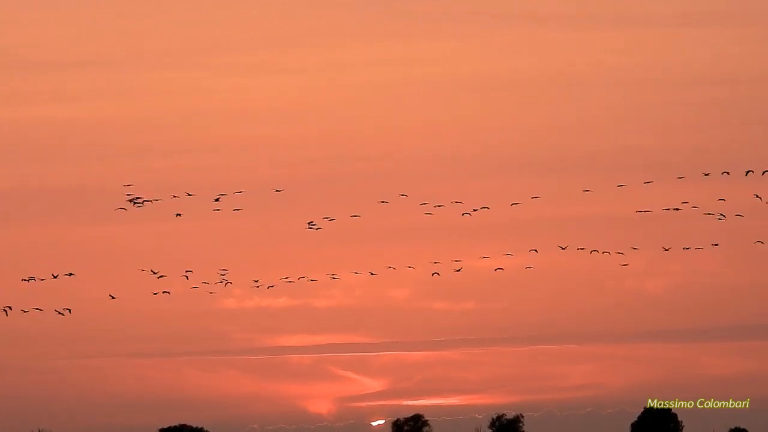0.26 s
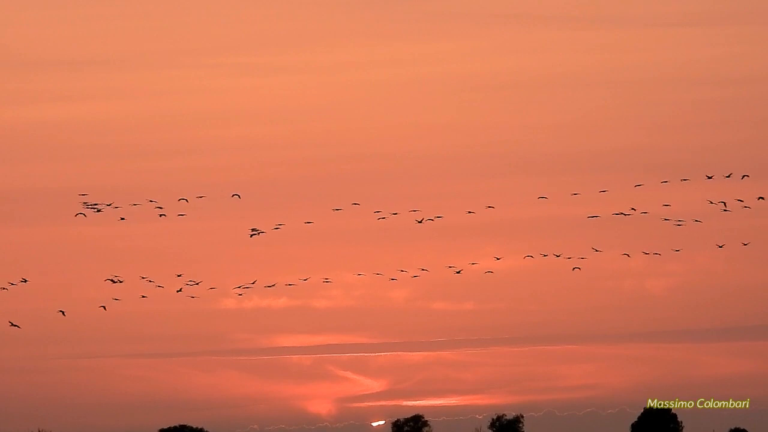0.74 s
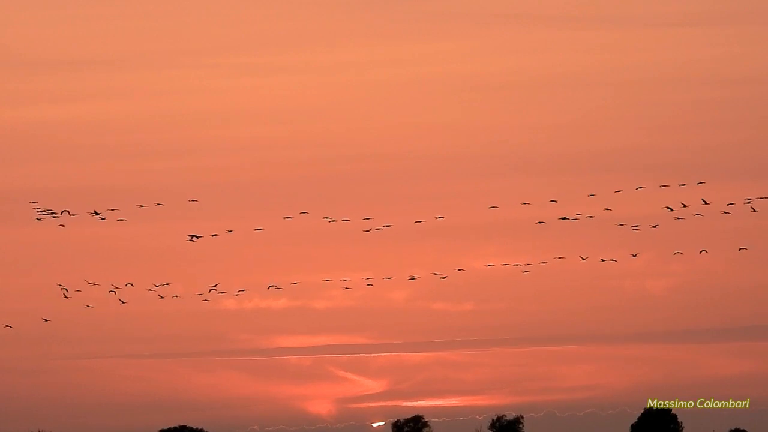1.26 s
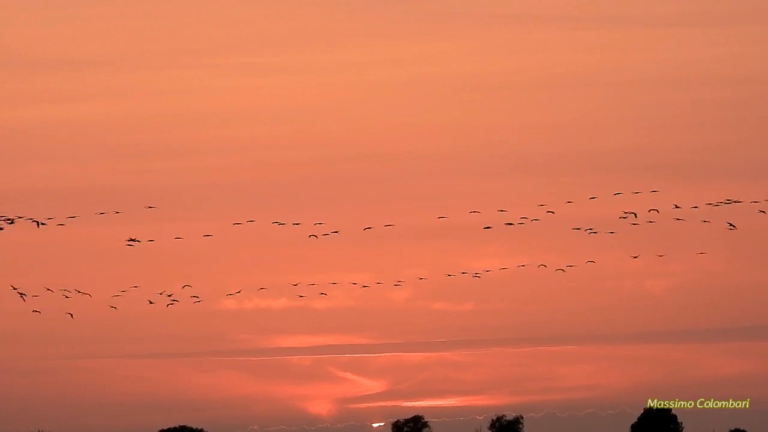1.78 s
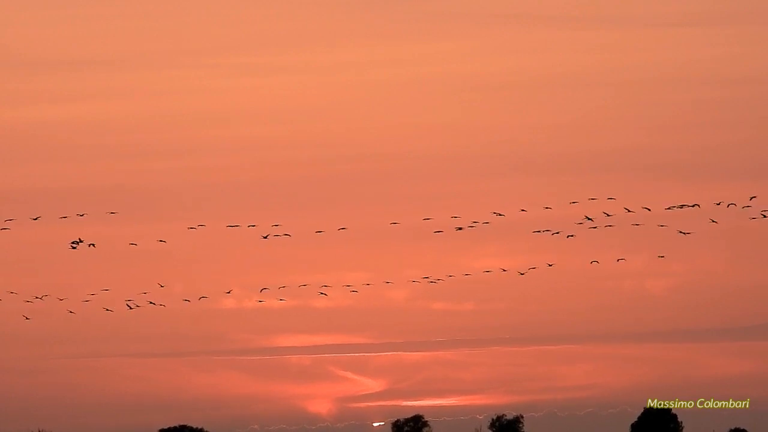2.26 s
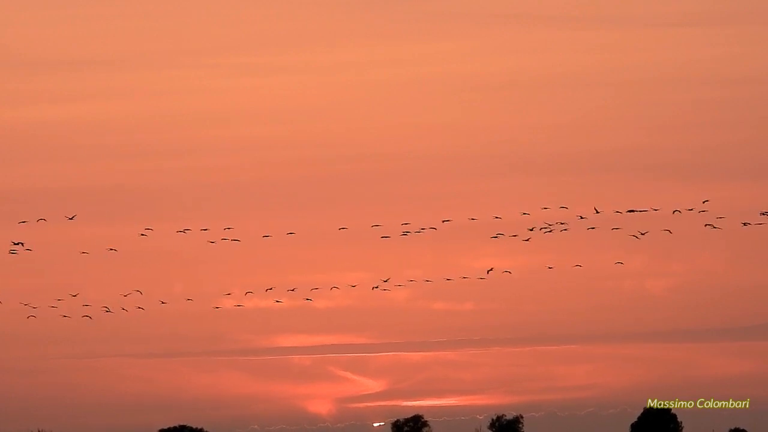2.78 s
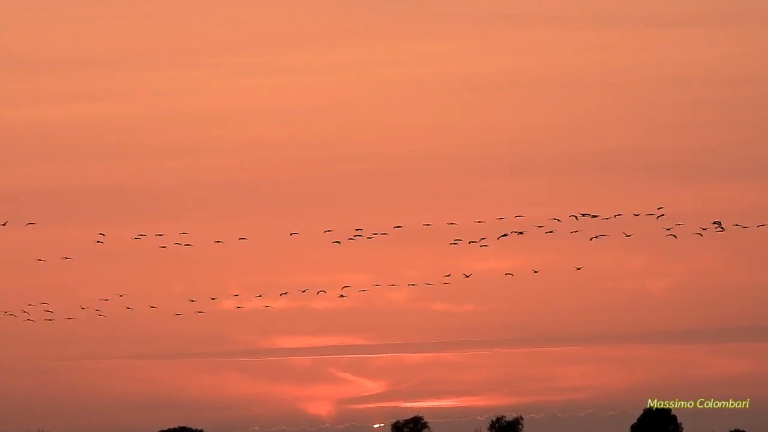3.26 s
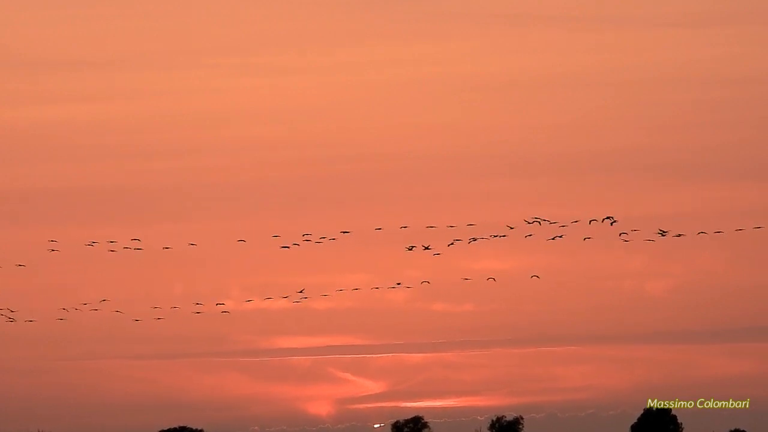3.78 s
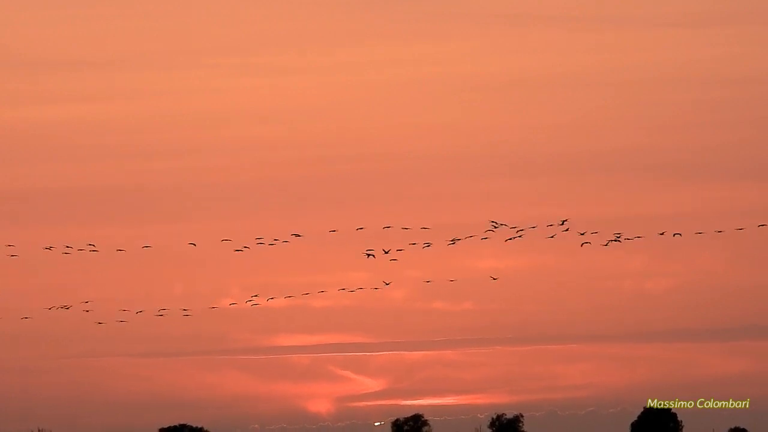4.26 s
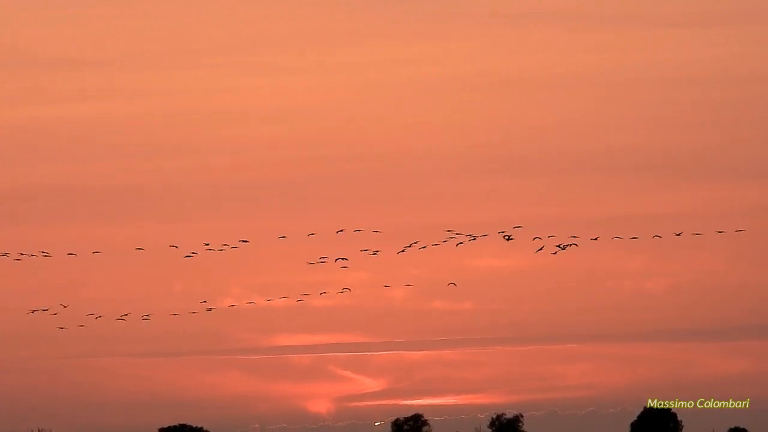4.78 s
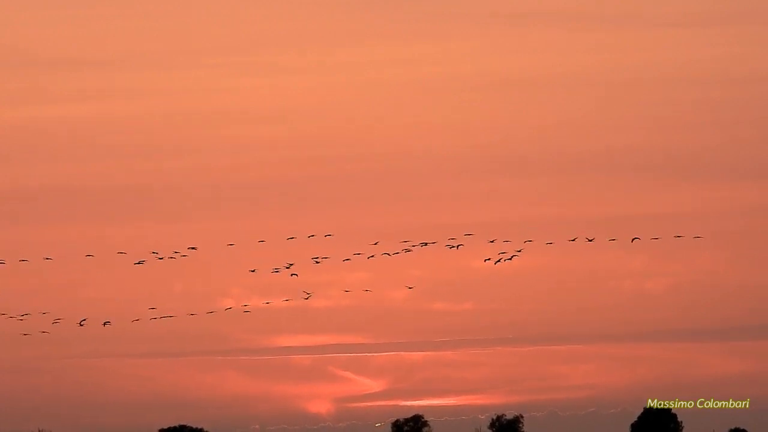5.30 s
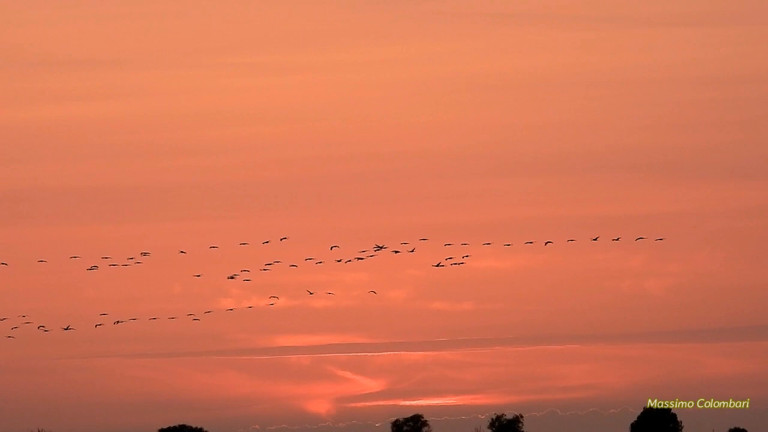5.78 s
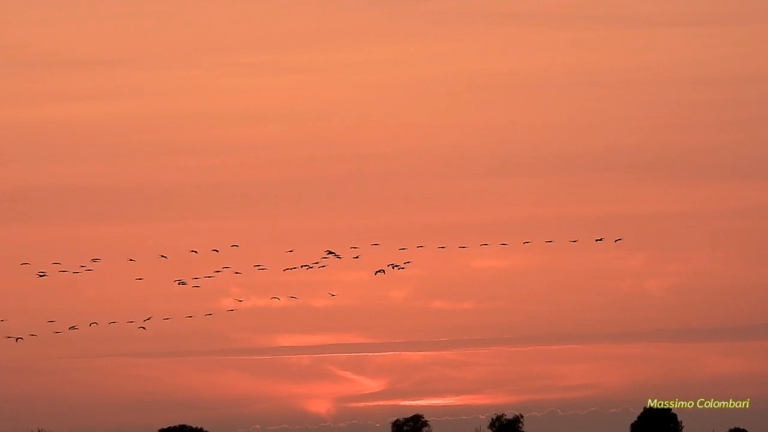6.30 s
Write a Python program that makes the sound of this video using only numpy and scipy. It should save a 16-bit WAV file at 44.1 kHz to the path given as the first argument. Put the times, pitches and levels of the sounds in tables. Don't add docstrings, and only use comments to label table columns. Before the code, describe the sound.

Outdoors, a long flock of cranes passes high up: rolling, throaty rattles, short yelps and trumpeted notes overlap over a breathy far chorus. A trilled young whistle comes early, more thin peeps past the middle, and a loud warbling bugle near the end. Faint rumble of open air and a few dull bumps on the microphone body. Little echo; everything is on the right, with only quiet electronic hiss on the left.

```python
import sys
import numpy as np
from scipy import signal
from scipy.fft import rfft, irfft
from scipy.io import wavfile
from scipy.ndimage import uniform_filter1d

SR = 44100
rng = np.random.default_rng(int(sys.argv[2]) if len(sys.argv) > 2 else 0)


def ratio(d):
    e = np.asarray(d, float) / 20
    return 10 ** e


def put_to_file(sound):
    columns = np.atleast_2d(sound).T
    safe = np.clip(columns, -1, 1)
    whole_steps = np.round(safe * 32767)
    wavfile.write(sys.argv[1], SR, whole_steps.astype(np.int16))


N = 288414


def read(table, hz):
    f, db = np.transpose(table)
    return ratio(np.interp(np.log(hz + 1), np.log(f), db))


def unit(x):
    return x / np.sqrt(np.mean(x ** 2))


def noise(colour):
    spectrum = rfft(rng.standard_normal(N))
    return unit(irfft(spectrum * read(colour, np.fft.rfftfreq(N, 1 / SR)), N))


def walk(n, rate):
    k = int(SR / rate)
    steps = np.repeat(rng.standard_normal(n // k + 1), k)
    return 1.3 * uniform_filter1d(uniform_filter1d(steps, k), k)[:n]


def add(out, start, x):
    out[start:start + len(x)] += x[:len(out) - start]


def curve(rows, edge_s):
    s, *columns = np.transpose(rows)
    t = np.arange(int(max(s[0] - edge_s, 0) * SR), int((s[-1] + edge_s) * SR)) / SR
    ends = np.clip(np.minimum(t - s[0], s[-1] - t) / edge_s + 1, 0, 1) ** 2
    return t, [uniform_filter1d(np.interp(t, s, c), size=400) for c in columns], ends


# f/Hz, level/dB
THROAT_COLOUR = [(1700, 2), (2200, 0.5), (2600, 0), (3300, 3.5), (4200, -6), (5500, -13.5), (7000, -26),
                 (11000, -56)]


def horn(hz, tilt_db=0., twinkle_db=0., count=7):
    phase = 2 * np.pi * (np.cumsum(hz) / SR + rng.random())
    over = 0
    for k in range(2, count + 1):
        db = tilt_db * (k - 3)
        if twinkle_db:
            db = db + twinkle_db * walk(len(hz), 260)
        over = over + read(THROAT_COLOUR, k * hz.mean()) * ratio(db) * np.sin(k * phase + k * k)
    return np.sqrt(2) * np.sin(phase), np.sqrt(2) * over


# f/Hz, level/dB per Hz
RASP_COLOUR = [(800, -41), (1500, -12.5), (3300, 7.5), (5000, 0.5), (6500, -11), (8500, -25), (12000, -66)]


def rasping_air():
    return noise(RASP_COLOUR)


# f/Hz, level/dB per Hz
HISS_COLOUR = [(20, -27), (50, -20), (120, -7), (300, -1), (1000, -3.5), (5000, -1.5), (15000, -3),
               (20000, -32)]


def amplifier_hiss():
    return ratio(-60.5) * np.array([noise(HISS_COLOUR), noise(HISS_COLOUR)])


# f/Hz, level/dB per Hz
RUMBLE_COLOUR = [(20, -62), (60, -7.5), (200, -3.5), (400, 4), (900, -6.5), (3000, -60)]


def country_rumble():
    return ratio(-65 + 1.4 * np.tanh(walk(N, 7.0))) * noise(RUMBLE_COLOUR)


# middle t/s, length t/s, strength level/dB,
# share of high voices (0-1), rasp of birds overhead level/dB
FLOCK_SURGES = [(0.0, 0.085, -30.5, 0.95, -24), (0.122, 0.22, -40, 0.05, -25), (0.365, 0.67, -45, 0.8, 1.5),
                (0.704, 0.21, -40.5, 0.5, 4), (1.135, 0.3, -42.5, 0.46, -23),
                (1.307, 0.35, -37, 0.48, -2.5), (1.735, 0.19, -35, 0.7, 0.5), (2.28, 0.35, -39, 0.46, 5.5),
                (2.453, 0.37, -39.5, 1, -15), (2.74, 0.29, -40.5, 0.07, -4.5), (2.886, 0.15, -38.5, 1, -34),
                (3.178, 0.28, -40, 0.68, -5), (3.459, 0.2, -35.5, 0.89, 5), (3.948, 0.33, -32, 0.94, -5.5),
                (4.176, 0.16, -43.5, 0.26, -28), (4.51, 0.23, -39.5, 0.87, 4.5),
                (5.072, 0.24, -36.5, 0.82, -34), (5.531, 0.23, -35.5, 1, -1),
                (5.74, 0.24, -40.5, 0.24, -27), (5.978, 0.21, -38.5, 0.68, -28), (6.223, 0.21, -46.5, 0, 2),
                (6.54, 0.17, -34, 1, -1)]


def surges():
    t = np.arange(N) / SR
    murmur_db, murmur_rasp_db = -49.5, -75
    power = np.ones((3, N)) * ratio([[murmur_db], [murmur_db], [murmur_rasp_db]]) ** 2
    for s, length_s, db, share, rasp_db in FLOCK_SURGES:
        share = np.clip(share, 0, 1)
        swell = ratio(2 * db) * np.exp(-(2 * (t - s) / length_s) ** 2)
        power = power + np.outer([1 - share, share, ratio(2 * rasp_db)], swell)
    return 10 * np.log10(power)


def chorus(hz, spread, count):
    low, over, pulsing = np.zeros((3, N))
    for place, (late, size, pitch, roll, loud) in enumerate(rng.random((count, 5))):
        n = int((.22 + .2 * size) * SR)
        u, t = np.arange(n) / n, np.arange(n) / SR
        cycle = (t * (19 + 7 * roll)) % 1
        open_share = 0.2473 + 0.412 * u
        gate = uniform_filter1d(1. * (cycle < open_share), size=130)
        gate = ratio(2 * loud) * gate * np.sin(np.pi * u) ** 0.079
        call_arch = .04 * np.sin(np.pi * u)
        pulse_arch = .03 * np.sin(np.pi * cycle / open_share)
        arch = 1 + call_arch + pulse_arch + .016 * walk(n, 170)
        bird_hz = hz * (1 + spread * (2 * pitch - 1))
        a, b = horn(bird_hz * arch, tilt_db=-1.0, count=6)
        start = int((place + late) / count * N)
        lead = min(start, n // 2)
        for layer, x in [(low, a * gate), (over, b * gate), (pulsing, gate)]:
            add(layer, start - lead, x[n // 2 - lead:])
    return low, over, pulsing


def steady(x, keep=0.058):
    power = uniform_filter1d(x ** 2, size=5000) + 1e-9
    return unit(x / power ** ((1 - keep) / 2))


# f/Hz, level/dB per Hz
WASH_COLOUR = [(200, -33), (500, 0), (1300, 8.5), (3500, -6), (6000, -55), (9000, -59)]


def breathy_wash(over_db):
    gasps_db = 3 * walk(N, 25)
    return ratio(-52 + 0.69 * (over_db + 56) + gasps_db) * noise(WASH_COLOUR)


# middle t/s, length t/s, level
# change/dB
FLOCK_LULLS = [(.3, .03, 1), (.85, 0.023, -1.5), (1.085, 0.015, 0), (1.1, .02, -5.5), (1.365, 0.013, -7.5),
               (1.552, 0.025, -4), (1.61, 0.014, 1), (1.879, 0.044, -2.5), (3.117, .02, -3.5),
               (3.156, .02, -1), (3.506, 0.011, -7), (3.68, 0.019, -5), (3.724, 0.02, -5),
               (4.31, 0.049, -4), (4.362, 0.042, -0.5), (5.4, 0.02, 1), (1.29, .015, -2), (3.168, .012, -1),
               (2.96, .12, -2.5), (.95, .15, -1), (2.005, .02, 1), (0.467, 0.047, -4.5), (5.6, .04, -6),
               (5.27, .06, -3.5), (3.8, .15, -1.5)]


def far_flock():
    low_db, high_db, rasp_db = surges()
    strength_db = 10 * np.log10(ratio(2 * low_db) + ratio(2 * high_db))
    over_db = -50.5 + 0.98 * (strength_db + 40)
    deep_low, deep_over, deep_pulsing = chorus(750, .13, count=70)
    high_low, high_over, high_pulsing = chorus(1010, .07, count=65)
    rasp = ratio(rasp_db - 13.0) * steady((deep_pulsing + high_pulsing) ** 1.06 * rasping_air())
    voices = ratio(low_db + 0.5) * steady(deep_low) + ratio(high_db - 3.5) * steady(high_low)
    voices = voices + ratio(over_db) * steady(deep_over + high_over)
    t = np.arange(N) / SR
    lull_db = sum(db * np.exp(-(2 * (t - s) / length_s) ** 2) for s, length_s, db in FLOCK_LULLS)
    return ratio(lull_db) * (voices + rasp + breathy_wash(over_db))


# t/s, peak level/dB, ring f/Hz
HAND_KNOCKS = [
    (1.058, -55, 109),
    (1.539, -53, 218),
    (1.614, -51, 240),
    (1.806, -56.5, 121),
    (1.923, -53, 266),
    (1.995, -52, 162),
    (2.628, -47.5, 239),
    (2.857, -34, 233),
    (2.92, -44.5, 236),
]


def knocks():
    out, t = np.zeros(N), np.arange(int(.15 * SR)) / SR
    for s, db, hz in HAND_KNOCKS:
        ring = np.sin(2 * np.pi * hz * t) + 0.29 * np.sin(2 * np.pi * 0.46 * hz * t)
        add(out, int(s * SR), ratio(db) * ring * (t / 0.016) * np.exp(1 - t / 0.0098))
    return out


# t/s, f/Hz, level/dB
YOUNG_WHISTLES = [
    [(0.62, 3700, -56), (0.68, 4420, -47.5), (0.755, 4700, -45), (0.778, 4300, -46), (0.792, 4200, -43),
     (0.83, 3400, -53)],
    [(4.575, 3900, -55), (4.61, 4920, -48), (4.65, 4420, -46), (4.71, 3320, -52)],
    [(4.75, 3550, -57), (4.8, 3940, -57), (4.85, 3940, -57), (4.93, 3350, -56)],
    [(6.04, 4350, -58), (6.1, 4550, -56), (6.145, 4800, -56), (6.22, 3750, -53)],
    [(0.484, 3900, -52), (0.492, 3750, -46), (0.503, 3600, -52)],
    [(4.545, 3850, -54), (4.562, 4400, -51), (4.575, 4850, -53)],
]
# rate f/Hz, depth as share of pitch, one crest t/s
WHISTLE_TRILLS = [
    (22.5, .075, .719),
    (20, .01, 4.61),
    (20, .01, 4.83),
    (23, .025, 6.14),
    (20, 0, .5),
    (20, 0, 4.56),
]


def whistles():
    out = np.zeros(N)
    for rows, (trill_hz, depth, crest_s) in zip(YOUNG_WHISTLES, WHISTLE_TRILLS):
        t, (hz, db), ends = curve(rows, 0.011)
        trill_fade = np.clip((t[-1] - t - .062) / .015, 0, 1)
        swing = np.cos(2 * np.pi * trill_hz * (t - crest_s)) * trill_fade
        pitch = hz * (1 + depth * swing + 0.0035 * walk(len(t), 62.4))
        trough_db = -3 * swing * (depth > .05)
        gain = ends * ratio(db + trough_db + 3.0 * walk(len(t), 200))
        add(out, int(t[0] * SR), gain * np.sin(2 * np.pi * np.cumsum(pitch) / SR))
    return out


def pulses(table, rasp_db):
    gap_s = .044
    for first, last, hz, db, over_db in table:
        for u in np.linspace(0, 1, round((last - first) / gap_s) + 1):
            rise = (2 * u - 1) * (last - first > gap_s / 2)
            yield first + u * (last - first), db + 0.5 * rise, hz * (1 + 0.029 * rise), over_db, rasp_db


# first pulse t/s, last pulse t/s, f/Hz, peak level/dB, overtones level/dB
PURRING_RATTLES = [(.121, .21, 854, -26.5, -3), (.514, .606, 1074, -30.5, 1), (.824, .958, 1020, -31, -29),
                   (1.087, 1.12, 836, -26.5, -10.5), (1.296, 1.296, 1067, -26.5, -30),
                   (1.566, 1.617, 1063, -31, 2.5), (1.9, 1.9, 1060, -35, -9), (2.017, 2.017, 1100, -37, -3),
                   (2.522, 2.596, 1008, -29, -3.5), (2.752, 2.752, 830, -34, -27),
                   (3.129, 3.177, 892, -28, -5.5), (3.693, 3.734, 914, -29, -12),
                   (3.754, 3.754, 1035, -38.5, 7.5), (4.32, 4.462, 1005, -28, -6),
                   (6.409, 6.461, 963, -31.5, -2), (1.132, 1.132, 848, -34, -3),
                   (1.345, 1.345, 1064, -24, -16), (1.377, 1.377, 1160, -30.5, -5),
                   (.863, .863, 1060, -30, -20), (3.45, 3.487, 1140, -34, 2), (3.524, 3.524, 1130, -50, 0),
                   (3.537, 3.537, 1120, -48, 7), (4.478, 4.5, 933, -30, -6), (.344, .344, 992, -41, 5),
                   (.36, .385, 1015, -40, 2.5), (1.172, 1.172, 1003, -44, 4), (.08, .08, 896, -27, -4),
                   (3.435, 3.435, 1123, -36.5, 6), (3.51, 3.51, 1162, -35.5, 4.5),
                   (3.473, 3.473, 1073, -39, 6)]
# first pulse t/s, last pulse t/s, f/Hz, peak level/dB, overtones level/dB
HARSH_RATTLES = [(.02, .28, 802, -41.5, 5), (.359, .387, 1005, -31.5, -23), (.653, .653, 1140, -35, -6),
                 (.791, .791, 1005, -35, -24), (1.162, 1.162, 953, -38.5, 9),
                 (1.335, 1.377, 1050, -28, -25), (1.66, 1.711, 1075, -32, 7), (1.779, 1.779, 960, -34, -21),
                 (2.139, 2.139, 1160, -43, -7), (2.154, 2.276, 809, -35, 1.5),
                 (2.351, 2.387, 1006, -26.5, -6), (2.644, 2.644, 1057, -33, -1),
                 (3.258, 3.301, 970, -36, -16), (3.433, 3.51, 1125, -30.5, -9),
                 (3.539, 3.574, 808, -33.5, -3), (4.491, 4.491, 980, -31, -14), (5.09, 5.139, 1013, -36, 3),
                 (5.075, 5.21, 742, -35.5, 0), (5.419, 5.419, 940, -34, -1), (6.507, 6.507, 1020, -33, 4.5),
                 (.318, .318, 1056, -34, -13), (.401, .425, 1040, -34.5, -23), (.492, .492, 1000, -36, -12),
                 (1.225, 1.225, 1020, -33, -4), (2.431, 2.431, 1067, -30.5, -1),
                 (2.507, 2.507, 1087, -42, 0), (2.76, 2.805, 987, -38, 2), (3.058, 3.094, 1000, -42, -10),
                 (3.527, 3.545, 1110, -40, -2), (4.97, 4.97, 800, -45, 5), (5.955, 5.955, 1100, -35, -9),
                 (3.992, 3.992, 1320, -27, -9), (3.57, 3.585, 1090, -57, -2), (6.521, 6.521, 1010, -34, 6),
                 (1.05, 1.05, 850, -49, 8)]


def rattles():
    out, t, air = np.zeros(N), np.arange(int(.04 * SR)) / SR, rasping_air()
    burst = np.clip(t / 0.0024, 0, 1) * np.exp(-(t / 0.012) ** 3)
    puff = np.clip(t / .004, 0, 1) * np.exp(-(t / .021) ** 2)
    for s, db, hz, over_db, rasp_db in [*pulses(PURRING_RATTLES, -32), *pulses(HARSH_RATTLES, -7)]:
        pitch = hz * (1.03 - .8 * t + 0.022 * walk(len(t), 150))
        low, over = horn(pitch, tilt_db=-1.5)
        start = int(s * SR)
        rasp = air[start:][:len(t)]
        add(out, start, ratio(db - 4.5) * burst * (low + ratio(over_db - 10.5) * over))
        add(out, start, ratio(db + rasp_db - 8.0) * puff[:len(rasp)] * rasp)
    return out


def note(start, end, hz, db, over_db, forced):
    if forced:
        scoop, drift, fall, release_s = .004, .02, .14, .06
        attack_s, attack_db, droop_db, release_db = 0, 2, 0.5, -5.5
    else:
        scoop, drift, fall, release_s = .025, .004, .04, .05
        attack_s, attack_db, droop_db, release_db = 0.04, -0.64, 1.5, 0.92
    part = (end - start) * .45
    fall = fall * min(part / release_s, 1)
    return [(start, hz * (1 - scoop), db + attack_db, over_db),
            (start + min(attack_s, part), hz, db, over_db),
            (end - min(release_s, part), hz * (1 - drift), db + droop_db, over_db),
            (end, hz * (1 - fall), db + release_db, over_db)]


def sing(out, rows, tilt_db, air, dips=()):
    t, (hz, db, over_db), ends = curve(rows, .006)
    dip = sum(d * np.exp(-((t - s) / 0.011) ** 2) for s, d in dips)
    strain = np.clip((hz.mean() - 800) / 80, .25, 1)
    pitch = hz * (1 - dip + .008 * strain * walk(len(t), 200))
    low, over = horn(pitch, tilt_db, twinkle_db=1.6 + 1.6 * strain, count=8)
    beat_hz = 70 * (1 + .25 * walk(len(t), 40))
    beat_db = 2.5 * strain * np.sin(2 * np.pi * np.cumsum(beat_hz) / SR + 6 * rng.random())
    low = low * ratio(1.5 * walk(len(t), 150) + beat_db)
    start = int(t[0] * SR)
    hoarse = ratio(-22) * strain * air[start:][:len(t)]
    over = over * ratio(beat_db) + hoarse
    add(out, start, (low + over * ratio(over_db)) * ends * ratio(db - 87 * dip))


# start t/s, end t/s, f/Hz, level/dB, overtones level/dB
HIGH_TURNED_AWAY = [
    (0.0, 0.083, 1077, -38, -17),
    (0.657, 0.765, 1086, -42, -9),
    (2.65, 2.794, 1046, -40.5, -26),
    (4.04, 4.149, 1090, -38.5, -18),
    (.448, .49, 1090, -46.5, -11),
    (5.6, 5.7, 1035, -40.5, -10.5),
    (5.435, 5.53, 1095, -37.5, -13),
    (5.375, 5.425, 630, -60, -20),
]
LOW_TURNED_AWAY = [
    (3.635, 3.672, 802, -53.5, 0),
    (0.56, 0.69, 800, -52, -5),
    (2.5, 2.722, 820, -53, -13),
    (4.661, 4.792, 840, -50, -14),
    (5.295, 5.45, 803, -50, -9.5),
    (5.851, 6.029, 960, -51, -10),
    (3.023, 3.08, 780, -55, -14),
]
LOW_SIDE = [(1.9, 1.972, 1085, -36.5, -21), (1.976, 2.0, 1135, -39.5, -17),
            (2.018, 2.095, 1084, -35, -20.5), (2.57, 2.7, 1068, -51, -5), (2.945, 3.11, 1030, -40.5, -16),
            (2.72, 2.777, 925, -48, -7), (.2, .24, 750, -46, -6), (.17, 0.281, 807, -40, -10.5),
            (0.15, 0.166, 716, -53.5, 3), (0.009, 0.075, 796, -42, -11), (0.763, 0.814, 646, -47, -33),
            (1.655, 1.881, 664, -48.5, -28), (2.15, 2.344, 804, -43.5, -12),
            (2.649, 2.872, 650, -52.5, -20), (3.52, 3.696, 801, -46, -12.5), (4.05, 4.34, 815, -51.5, -4.5),
            (4.7, 4.895, 494, -60, -13), (4.72, 4.868, 793, -45.5, -17.5), (5.735, 5.88, 812, -50.5, -5.5),
            (5.88, 6.114, 502, -59, -13)]
HIGH_SIDE = [
    (0.76, 1.1, 1065, -46.5, -21),
    (1.204, 1.263, 1330, -43.5, -15),
    (2.09, 2.125, 870, -43.5, -19),
    (2.32, 2.481, 1100, -35, -19.5),
    (2.276, 2.342, 1005, -43, -11.5),
    (0.27, 0.44, 1030, -46.5, -12),
    (2.867, 2.981, 1075, -37.5, -41),
    (3.992, 4.04, 1240, -39, -8),
    (3.755, 3.85, 1050, -47, -10.5),
    (6.02, 6.17, 1200, -49, -21),
]
HIGH_TOWARDS = [
    (1.383, 1.486, 1060, -36, -18.5),
    (1.718, 1.849, 1060, -40.5, -9),
    (3.311, 3.449, 885, -42.5, -8),
]
# t/s, f/Hz, level/dB, overtones level/dB
WARBLED_NOTES = [
    [(4.385, 830, -41, -12), (4.41, 872, -47.5, -4.5), (4.53, 880, -43, -6.5), (4.585, 915, -35.5, -11),
     (4.605, 985, -36.5, -12.5), (4.64, 975, -35.5, -14.5), (4.665, 869, -37, -15.5)],
    [(3.865, 1100, -47, -5), (3.895, 1110, -44, -0.5), (3.955, 1108, -46.5, 4), (4.0, 1114, -38, -7)],
    [(5.42, 1061, -34.5, -19), (5.47, 1105, -31, -12.5), (5.535, 1170, -30, -14.5),
     (5.595, 1140, -30, -11.5), (5.64, 1013, -36.5, -19), (5.69, 1024, -38, -28)],
    [(6.16, 788, -39.5, -16), (6.225, 833, -39, -9.5), (6.27, 836, -36, -11.5), (6.33, 833, -39, -8),
     (6.39, 735, -43.5, -20)],
]
WARBLE_TILTS = [-1.7, -0.1, 0.05, 0.6]
# t/s, share of pitch lost
WARBLE_DIPS = [
    (3.926, 0.039),
    (3.984, 0.063),
    (5.5, 0.067),
    (5.556, 0.057),
    (6.193, 0.048),
    (6.245, 0.049),
    (6.29, 0.067),
]


def bugles():
    out, air = np.zeros(N), rasping_air()
    facing_db, side_db, away_db = .3, -1, -7
    groups = [(HIGH_TURNED_AWAY, away_db, True), (LOW_TURNED_AWAY, away_db, False), (LOW_SIDE, side_db, False),
              (HIGH_SIDE, side_db, True), (HIGH_TOWARDS, facing_db, True)]
    for table, tilt_db, forced in groups:
        for row in table:
            sing(out, note(*row, forced), tilt_db, air)
    for rows, tilt_db in zip(WARBLED_NOTES, WARBLE_TILTS):
        sing(out, rows, tilt_db, air, WARBLE_DIPS)
    return out


def scene():
    outdoors = country_rumble() + far_flock() + whistles() + rattles() + bugles()
    outdoors = outdoors * np.clip(np.arange(N) / (.004 * SR), 0, 1)
    t = np.arange(int(.25 * SR)) / SR
    field = ratio(-14.0) * rng.standard_normal(len(t)) * np.exp(-t / 0.052) / np.sqrt(0.017 * SR)
    field[0] = 1
    right = 2 * (signal.fftconvolve(outdoors, field)[:N] + knocks())
    return np.array([np.zeros(N), right])


def low_pass(x):
    return signal.sosfilt(signal.butter(12, 15770, fs=SR, output="sos"), x)


def record(dry):
    mix = dry + amplifier_hiss()
    return low_pass(mix)


dry = scene()
out = record(dry)
put_to_file(out)
```